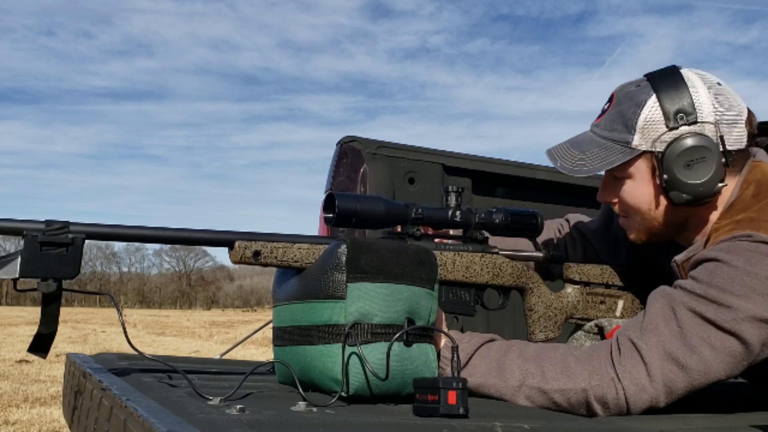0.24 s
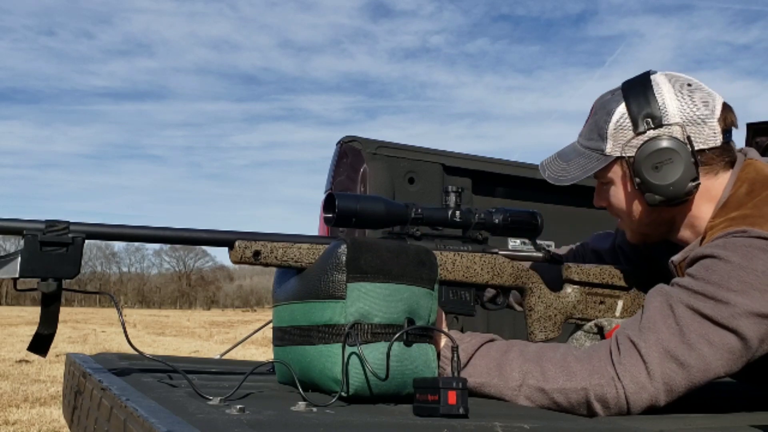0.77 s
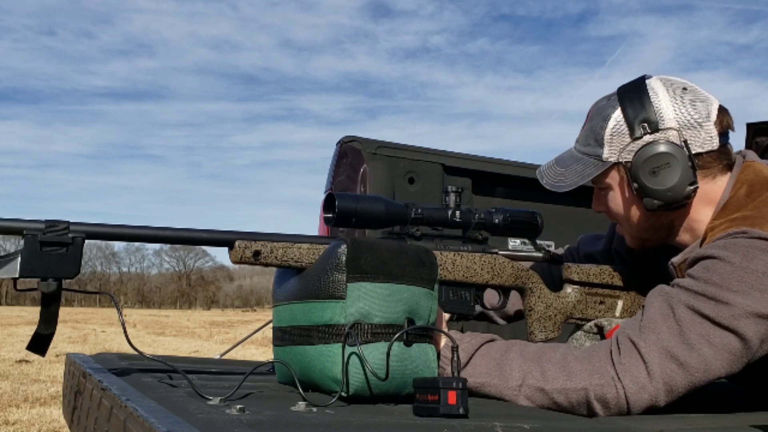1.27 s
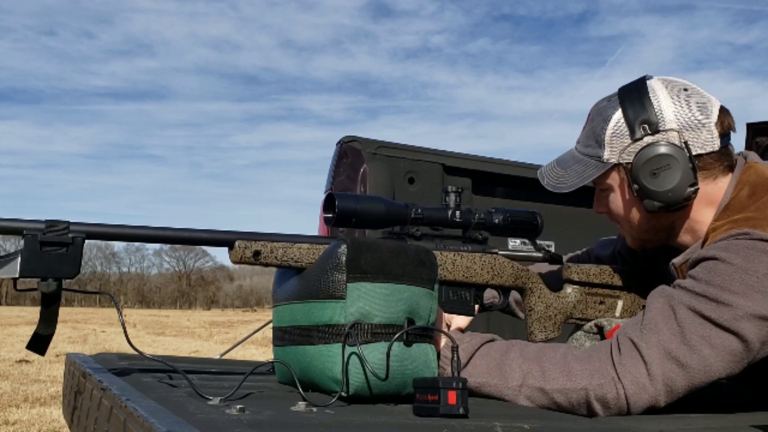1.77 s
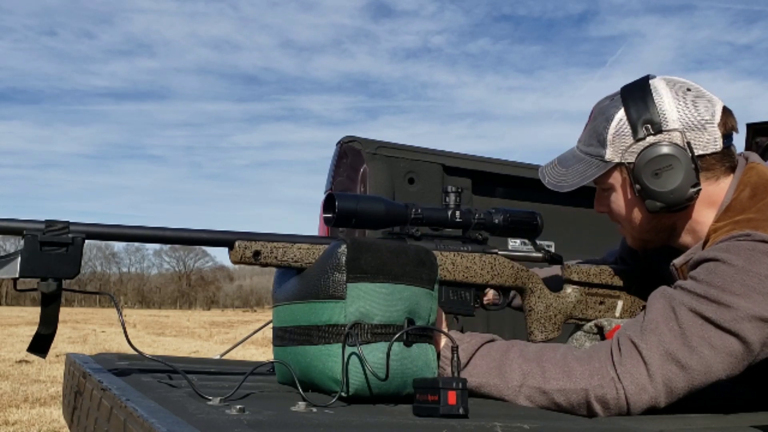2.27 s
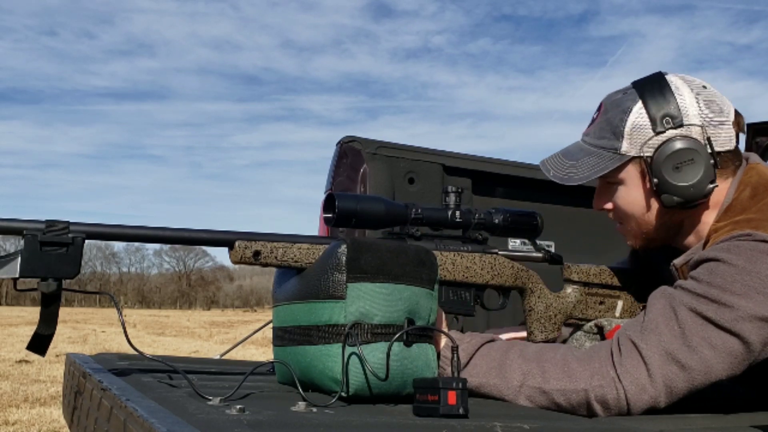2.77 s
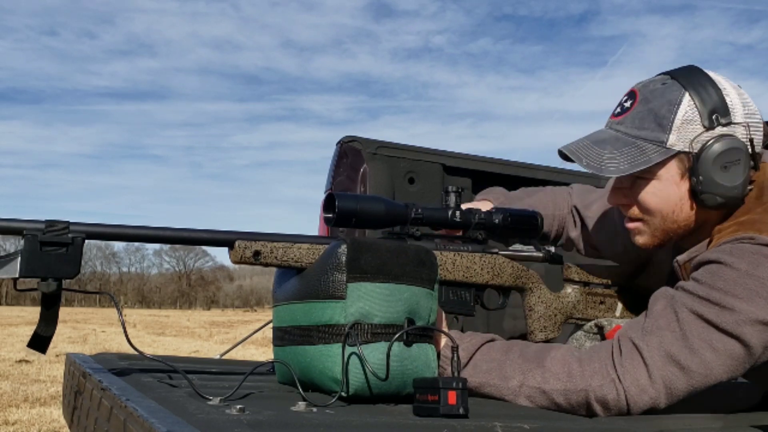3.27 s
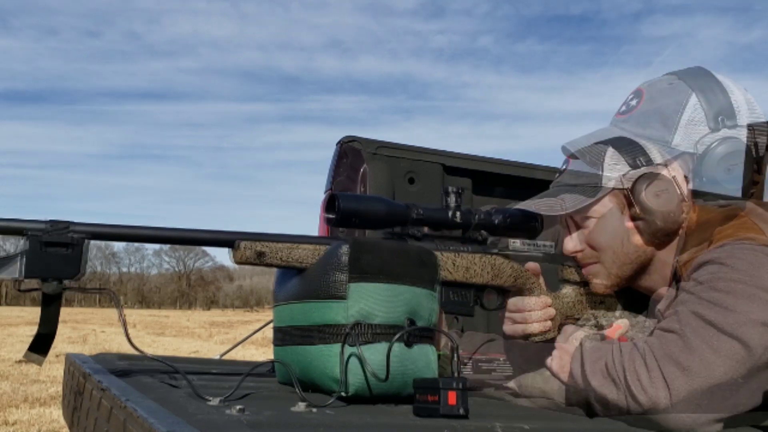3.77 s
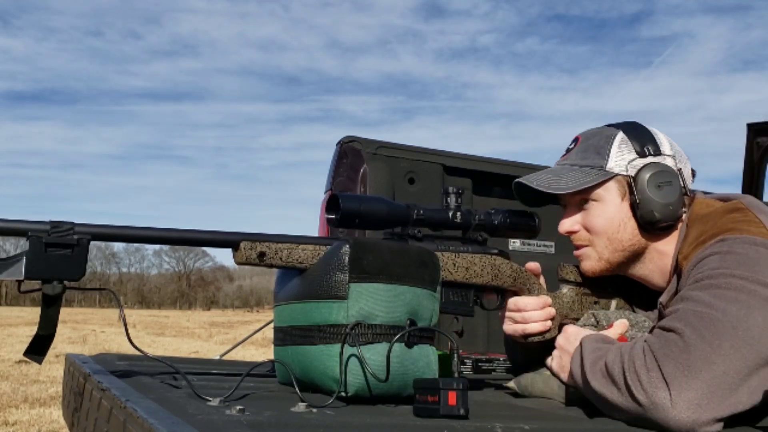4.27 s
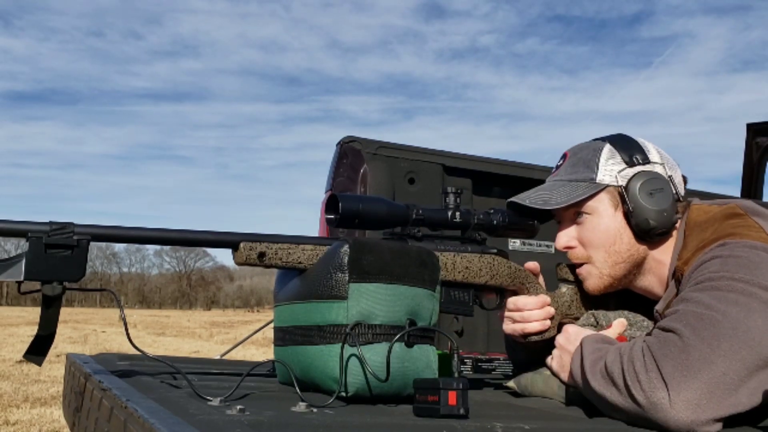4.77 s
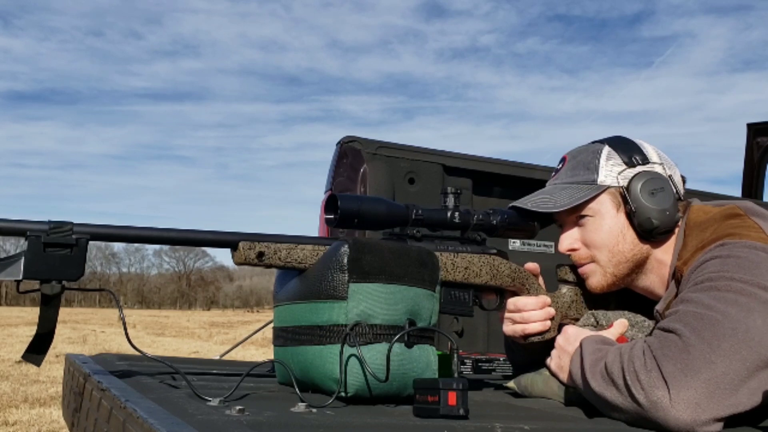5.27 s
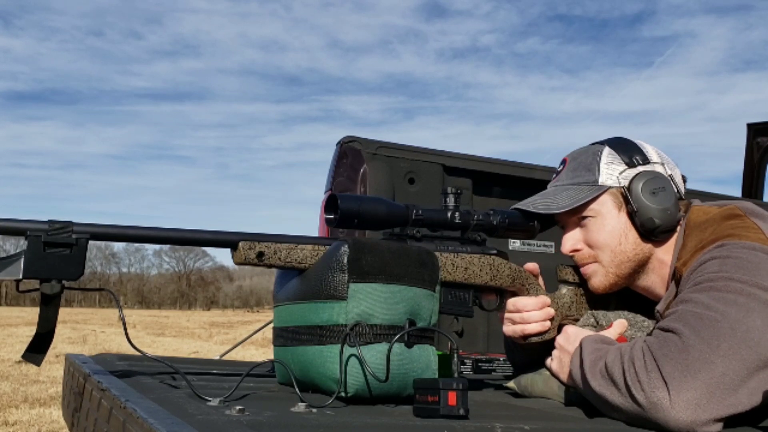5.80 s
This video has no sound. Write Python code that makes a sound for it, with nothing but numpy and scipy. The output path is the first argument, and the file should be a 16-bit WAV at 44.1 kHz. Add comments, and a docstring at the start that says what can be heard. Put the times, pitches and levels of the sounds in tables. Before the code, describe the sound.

A bolt-action rifle is worked on a rest in an open pickup bed in a quiet field. The bolt slides briefly with soft bumps, then clacks shut with a hard double steel knock. A hollow clunk follows, then tiny metallic chinks and a dull shift. Heavy thumps boom in the bed, trailed by faint taps and rubbing. Close stereo microphones catch low wind buffeting and faint hiss.

```python
"""In the open bed of a pickup, in a quiet field, a bolt-action rifle is worked on a rest. The bolt slides and
clacks shut, the action clunks hollowly, and the shooter's weight thumps the bed. Soft bumps, dry ticks, chinks
and rubbing fill the gaps, over gusts of rumble and a faint hiss that sinks midway and returns at once with a
tick and a low bump, then a low drone. Blows are coloured clicks with dense reflections, some with decaying
modes; friction, breeze and background are filtered noise under moving gains."""
import sys
import numpy as np
from scipy import signal
from scipy.fft import rfft, irfft, next_fast_len
from scipy.io import wavfile

SR = 44100
rng = np.random.default_rng(int(sys.argv[2]) if len(sys.argv) > 2 else 0)


def master_out(mix):
    """Clip the mix to full scale and print it as 16-bit PCM to the path in sys.argv[1]."""
    frames = np.transpose(np.atleast_2d(mix))
    ceiling = np.clip(frames, -1, 1)
    pcm = np.round(ceiling * 32767).astype(np.int16)
    wavfile.write(sys.argv[1], SR, pcm)


N = 266408
TIME = np.arange(N) / SR
RETURN_S = 3.743   # the sunken background comes back, with a tick and a low bump

# colour of small hard contacts: pitch_hz, level_db (per Hz)
TICK_COLOUR = [(600, -22), (1400, 8.5), (3000, -3), (5200, -0.5), (6400, -11.5), (7000, -3.5), (7400, -0.5),
               (7900, -6.5), (8600, -18), (15000, -12)]


def from_db(db):
    """Decibels to gain."""
    return 10 ** (np.asarray(db) / 20)


def rms_one(x):
    """Scale to rms 1."""
    return x / np.sqrt(np.mean(x ** 2) + 1e-20)


def at_hz(points, hz):
    """Read a table on a log-frequency axis."""
    table_hz, value = np.transpose(points)
    return np.interp(np.log(np.maximum(hz, 1)), np.log(table_hz), value)


def coloured(x, colour, tilt_db=0):
    """Causal (minimum-phase) filter with the given spectrum, tilted per octave and falling away past its ends."""
    n = x.shape[-1]
    size = 2 * next_fast_len(n // 2 + 4096)
    hz = np.maximum(np.fft.rfftfreq(size, 1 / SR), 1)
    loudest_hz = max(colour, key=lambda point: point[1])[0]
    octaves_outside = np.abs(np.log2(hz / np.clip(hz, colour[0][0], colour[-1][0])))
    db = at_hz(colour, hz) + tilt_db * np.log2(hz / loudest_hz) - 18 * octaves_outside
    # folding the cepstrum forward in time gives the minimum phase
    cepstrum = irfft(np.log(from_db(db) + 1e-7))
    cepstrum[1:size // 2] *= 2
    cepstrum[size // 2 + 1:] = 0
    response = np.exp(rfft(cepstrum))
    return irfft(rfft(x, size) * response)[..., :n]


def diffuse(n):
    """Noise from all sides at two spaced microphones: alike in the bass, unrelated in the treble."""
    spacing_m, sound_m_per_s = 0.26, 343
    alike = .97 * np.sinc(2 * np.fft.rfftfreq(n, 1 / SR) * spacing_m / sound_m_per_s)
    mid, side = rfft(rng.standard_normal((2, n)))
    return irfft(np.sqrt(1 + alike) * mid + np.sqrt(1 - alike) * side * [[1], [-1]], n)


def scatter(t, early_t60, ring_db):
    """Dense reflections in third-octave bands: a quick burst, then the bed's slower ring, each band at its own pace."""
    # ring of the truck bed: pitch_hz, t60_s
    bed_decay = [(80, 0.14), (250, 0.53), (600, 0.46), (1200, 0.29), (3000, 0.17), (10000, 0.26)]
    noise, hz = rfft(diffuse(len(t))), np.fft.rfftfreq(len(t), 1 / SR)
    edges = np.r_[0, np.geomspace(100, SR / 2, 24)]
    out = 0
    for low, high in zip(edges, edges[1:]):
        band = irfft(noise * ((hz >= low) & (hz < high)), len(t))
        ring_t60 = at_hz(bed_decay, (low + high) / 2)
        burst_t60 = early_t60 * ring_t60 / at_hz(bed_decay, 1000)   # early_t60 holds at 1 kHz
        fade = from_db(-60 * t / burst_t60) + from_db(ring_db - 60 * t / ring_t60)
        out = out + rms_one(band * fade) * np.sqrt(high - low)
    return rms_one(out) / np.sqrt(len(t))   # the energy of a one-sample click


def ringing(t, modes, tilt_db):
    """Decaying modes; sharp contacts favour high ones, which reach the two sides up to a quarter cycle apart."""
    out = 0
    for k, (hz, db, t60) in enumerate(modes):
        sign = (-1) ** k
        skew = sign * np.pi / 4 * np.tanh((hz / 700) ** 1.2) * np.array([[1], [-1]])
        strength_db = db + tilt_db * np.log2(hz / modes[0][0]) + rng.normal(0, 1)
        fade = from_db(strength_db - 60 * t / t60)
        out = out + sign * fade * np.sin(2 * np.pi * hz * t + skew)
    return out


def blows(hits, colour, level_db, direct_db, early_t60, ring_db, rise_s, modes=(), modes_db=0, echo_db=-40):
    """A coloured click and its echo off the bed wall; dense reflections and the part's modes build up over rise_s."""
    wall_echo_s = .0105
    t = np.arange(2 ** 15) / SR
    build = 1 - np.exp(-t / rise_s)
    echo = signal.unit_impulse(len(t), int(wall_echo_s * SR))
    strike = signal.unit_impulse(len(t)) + from_db(echo_db) * echo
    out = np.zeros((2, N + len(t)))
    for start_s, db, tilt_db in hits:
        click = build * scatter(t, early_t60, ring_db) + from_db(direct_db) * strike
        blow = rms_one(coloured(click, colour, tilt_db))
        if len(modes):
            blow = blow + from_db(modes_db) * rms_one(build ** 2 * ringing(t, modes, tilt_db))
        start = int(start_s * SR)
        out[:, start:start + len(t)] += from_db(db + level_db) * rms_one(blow)
    return out[:, :N]


def strokes(moves):
    """Gain of separate strokes: each swells to a rounded peak, then dies away evenly in decibels."""
    range_db = 19   # gained over the rise and lost over the fall
    power = 0
    for peak_s, db, rise_s, fall_s in moves:
        away = np.where(TIME < peak_s, ((peak_s - TIME) / rise_s) ** 2, (TIME - peak_s) / fall_s)
        power = power + from_db(db - range_db * np.minimum(away, 10)) ** 2
    return np.sqrt(power)


def rubbing(moves, colour, catches_per_s, catch_db):
    """Friction: a smooth hiss with tiny random catches in it."""
    snags = (rng.random(N) < catches_per_s / SR) * rng.standard_normal((2, N))
    friction = diffuse(N) + from_db(catch_db) * rms_one(snags)
    return strokes(moves) * rms_one(coloured(friction, colour))


def steady(before_db, after_db):
    """Gain of a steady layer: it sinks ever faster for a second, returns at once at a new level, then eases off."""
    sink_start_s, sink_db, sink_power = 2.75, 15.5, 1.35
    ease_db_per_s = 1.78
    sunk = np.clip((TIME - sink_start_s) / (RETURN_S - sink_start_s), 0, 1) ** sink_power
    easing_db = after_db - ease_db_per_s * (TIME - RETURN_S)
    return from_db(np.where(TIME < RETURN_S, before_db - sink_db * sunk, easing_db))


def background():
    """Open air from all sides, and the microphones' own unrelated hiss."""
    # open air: pitch_hz, level_db (per Hz)
    air_colour = [(260, -35), (450, -2), (560, -6.5), (772, -2), (1220, -9), (2110, -11.5), (4000, -30.5),
                  (5200, -43), (8800, -120)]
    # microphone hiss: pitch_hz, level_db (per Hz)
    hiss_colour = [(1470, -30), (2500, -3.5), (8380, -14), (12100, -7), (14800, -7), (15400, -5.5)]
    air = steady(before_db=-79.5, after_db=-74.5) * rms_one(coloured(diffuse(N), air_colour))
    hiss = rms_one(coloured(rng.standard_normal((2, N)), hiss_colour)) * from_db([[.5], [-.5]])
    return air + steady(before_db=-80.0, after_db=-77) * hiss


def gusts():
    """Strength of the breeze: each gust rises, holds and lets go, in random lumps."""
    # gusts before their lumps: start_s, end_s, level_db
    spells = [(0.015, 0.416, -49.5), (0.464, 0.63, -55.5), (0.824, 1.197, -51), (1.38, 1.943, -47.5),
              (2.2, 2.722, -67.5), (3.216, 3.702, -57.5), (4.016, 4.349, -62)]
    attack_s, release_s = 0.13, 0.17   # time to gain or lose 20 dB
    lumps_per_s, lump_db = 24, 2.5
    power = 0
    for start_s, end_s, db in spells:
        away = np.maximum((start_s - TIME) / attack_s, (TIME - end_s) / release_s)
        power = power + from_db(db - 20 * np.clip(away, 0, 10)) ** 2
    knots = np.arange(512)
    lumps = np.interp(TIME * lumps_per_s, knots, rng.standard_normal(len(knots)))
    return np.sqrt(power) * from_db(lump_db * lumps)


def wind(gust):
    """The breeze buffets each microphone on its own: unrelated low noise left and right."""
    # buffeting: pitch_hz, level_db (per Hz)
    colour = [(20, -9), (40, -3), (70, -2), (120, -7), (250, -27)]
    buffeting = rms_one(coloured(rng.standard_normal((2, N)), colour))
    return gust * buffeting * from_db([[-2.5], [1.5]])


def rumble(gust):
    """Deep and hollow rumble: a steady part, and a part raised by the gusts."""
    # deep rumble: pitch_hz, level_db (per Hz)
    deep_colour = [(20, -22), (45, -8.5), (65, 3), (85, -2.5), (115, -6), (160, -19.5)]
    # hollow rumble: pitch_hz, level_db (per Hz)
    hollow_colour = [(110, -2.5), (160, -5.5), (240, 2), (320, 2.5), (400, -4.5), (500, -6.5), (650, -25)]
    gust_deep_db, gust_hollow_db = -13, -15   # against the gusts' strength
    deep_gain = np.hypot(steady(before_db=-70, after_db=-73.5), gust * from_db(gust_deep_db))
    hollow_gain = np.hypot(steady(before_db=-79, after_db=-71.5), gust * from_db(gust_hollow_db))
    deep = deep_gain * rms_one(coloured(diffuse(N), deep_colour))
    return deep + hollow_gain * rms_one(coloured(diffuse(N), hollow_colour))


def bolt_slide():
    """The bolt slides in its raceway: dense catches over a hiss."""
    # slide: peak_s, level_db, rise_s, fall_s
    moves = [(0.066, -42, 0.056, 0.043)]
    # sliding steel: pitch_hz, level_db (per Hz)
    colour = [(350, -17), (550, -8.5), (800, -6), (1150, 4), (1450, -11), (1850, -10.5), (2100, -37),
              (2500, -14), (3100, -37), (3800, -20.5), (5300, -51), (6800, -36), (9000, -49),
              (11200, -32.5), (14000, -51)]
    return rubbing(moves, colour, catches_per_s=1000, catch_db=3.5)


def ticks():
    """Small dry ticks: mostly direct click, with a very short burst of reflections."""
    # ticks, strength before the layer's level: start_s, strength_db, brightness_db_per_octave; the last comes
    # as the background returns
    hits = [(0.0752, -34.5, -10.5), (0.0856, -49, 4), (2.698, -57, 4), (3.743, -50, -1.5)]
    return blows(hits, TICK_COLOUR, level_db=-35.5, direct_db=2, early_t60=0.029, ring_db=-14.5,
                 rise_s=0.00027)


def bumps():
    """Soft bumps build slowly and only stir the bed's bass."""
    # bumps, strength before the layer's level: start_s, strength_db, brightness_db_per_octave; the one at 3.744
    # s comes as the background returns
    hits = [(0.094, -36, -0.5), (0.121, -34.5, 0), (0.227, -29.5, -5), (0.313, -43, 4), (0.351, -45.5, 2.5),
            (0.623, -51, 3.5), (0.835, -43.5, -5), (0.950, -33.5, -2.5), (1.344, -45, 2),
            (1.395, -40, -1.5), (1.709, -35, -4), (1.844, -30.5, -1), (1.923, -38, 2), (2.292, -44.5, -5),
            (3.296, -38.5, -3.5), (3.546, -45, 1), (3.744, -34.5, -2.5), (4.812, -40, -1)]
    # soft contact: pitch_hz, level_db (per Hz)
    colour = [(25, -20.5), (50, 12), (85, 10), (150, 2.5), (280, -9.5), (420, -14.5), (650, -58.5),
              (1500, -51), (5000, -77.5)]
    soft = blows(hits, colour, level_db=-21.5, direct_db=-8.5, early_t60=0.02, ring_db=-25.5, rise_s=0.0028)
    return soft * from_db([[-.5], [.5]])


def bolt_catch():
    """Light clicks of the bolt's catch, with a strong echo off the bed wall."""
    # clicks, strength before the layer's level: start_s, strength_db, brightness_db_per_octave
    hits = [(1.395, -47.5, 1.5), (1.434, -50.5, -6.5)]
    # catch: pitch_hz, level_db (per Hz)
    colour = [(650, -18), (1000, 9.5), (1250, -12), (1600, -2.5), (2000, -13), (2450, -3.5), (3000, -1),
              (3700, -12.5), (6500, -22), (9000, -35.5), (15000, -36)]
    return blows(hits, colour, level_db=-25, direct_db=-9.5, early_t60=0.042, ring_db=0.5,
                 rise_s=0.00045, echo_db=-2)


def bolt_clacks():
    """The bolt clacks shut: steel on steel, with the bolt's modes ringing."""
    # clacks, strength before the layer's level: start_s, strength_db, brightness_db_per_octave
    hits = [(1.478, -48, -0.5), (1.4802, -20, 0), (1.5425, -24.5, 0.5), (1.5725, -38, -5)]
    # bolt contact: pitch_hz, level_db (per Hz)
    colour = [(120, -53), (200, -42.5), (344, -5), (383, -6.5), (467, 0.5), (659, -4), (833, -7.5),
              (1090, -3.5), (1260, -16), (1630, -16), (2600, -18.5), (2900, -14.5), (4890, -40.5),
              (9210, -53.5), (15000, -60.5)]
    # bolt modes: pitch_hz, relative level_db, t60_s
    modes = [(482, -5, 0.16), (505, 0, 0.2), (605, 0.5, 0.17), (1043, -3, 0.11), (1112, -15.5, 0.29),
             (1270, -20.5, 0.074), (1650, -11.5, 0.11), (1600, -2, 0.098), (2194, -11, 0.077),
             (2490, -19.5, 0.118), (2918, -10, 0.13), (3010, -4, 0.0438), (3760, -11, 0.045)]
    return blows(hits, colour, level_db=-23.5, direct_db=-6.0, early_t60=0.21, ring_db=-22,
                 rise_s=0.00045, modes=modes, modes_db=-3.5, echo_db=-7.5)


def drag():
    """A part is dragged softly along the stock and ends in a short bright scratch."""
    # drag: peak_s, level_db, rise_s, fall_s
    drag_moves = [(2.105, -69, 0.081, 0.17)]
    # soft drag: pitch_hz, level_db (per Hz)
    drag_colour = [(600, -3), (850, 9), (1200, 2), (1700, -11.5), (3000, -17.5), (4600, -21.5), (7000, -28)]
    # scratch: peak_s, level_db, rise_s, fall_s
    scratch_moves = [(2.214, -66.5, 0.029, 0.043)]
    # bright scratch: pitch_hz, level_db (per Hz)
    scratch_colour = [(900, -10), (1230, 9), (1600, -10), (3000, -11), (4200, 3), (5000, -2), (6200, -8),
                      (9000, -19), (14000, -22)]
    soft = rubbing(drag_moves, drag_colour, catches_per_s=66, catch_db=1)
    return soft + rubbing(scratch_moves, scratch_colour, catches_per_s=400, catch_db=1)


def action_clunk():
    """The action clunks: a light touch and then the seat, ringing its low hollow modes."""
    # touch and seat, strength before the layer's level: start_s, strength_db, brightness_db_per_octave
    hits = [(2.6535, -26.5, -0.5), (2.6555, -16.5, 0.5)]
    # action contact: pitch_hz, level_db (per Hz)
    colour = [(100, -31.5), (170, -12), (250, -2.5), (390, -8.5), (530, 5), (650, -1), (800, 1),
              (1150, -10.5), (1400, -13), (2000, -25), (2400, -27.5), (3200, -30.5), (5500, -54),
              (12000, -68.5)]
    # action modes: pitch_hz, relative level_db, t60_s
    modes = [(211, -18.5, 0.26), (256, -3, 0.17), (343, -9.5, 0.5), (438.5, -19, 0.58), (498, -3.5, 0.24),
             (576, -10.5, 0.21), (712, -17, .33), (692, -9, 0.22), (755, -4.5, .2), (809, -8.5, 0.12),
             (847, 0.5, 0.2), (1052, -9.5, 0.14), (1121, -6, .2), (1260, -2, 0.1), (1373, -28, .14),
             (1450, -29.5, 0.14), (1720, -14, 0.17), (1930, -16.5, 0.09), (2960, -31, .1)]
    return blows(hits, colour, level_db=-19.5, direct_db=-15.5, early_t60=0.14, ring_db=-3,
                 rise_s=0.00061, modes=modes, modes_db=-4.5)


def chinks():
    """A small steel part chinks: a tick with high ringing modes."""
    # chinks, strength before the layer's level: start_s, strength_db, brightness_db_per_octave
    hits = [(3.5857, -52, 3), (3.5965, -52.5, 3), (3.616, -59, 2)]
    # small steel part: pitch_hz, relative level_db, t60_s
    modes = [(1570, -4, 0.18), (3240, 0, 0.11), (3876, 3, 0.1), (5150, 4, 0.15), (7340, -6, 0.14),
             (7480, -9, 0.14), (9700, -5, .05)]
    return blows(hits, TICK_COLOUR, level_db=-35.5, direct_db=-5.5, early_t60=0.025, ring_db=-4,
                 rise_s=0.0003, modes=modes, modes_db=-2.5)


def stock_shift():
    """The stock shifts on its sandbag: dull friction with sparse, weak catches."""
    # shift: peak_s, level_db, rise_s, fall_s
    moves = [(3.655, -50.5, 0.062, 0.067)]
    # sandbag: pitch_hz, level_db (per Hz)
    colour = [(120, -1), (220, -2), (370, -1.5), (480, -7.5), (700, -23.5), (1200, -42)]
    return rubbing(moves, colour, catches_per_s=110, catch_db=-13.0)


def drone():
    """A low outdoor drone comes in when the background returns, then eases off with it."""
    # drone: pitch_hz, level_db (per Hz)
    colour = [(15, -51), (25, -25), (58, 3), (86, 0.5), (155, -2.5), (260, -12.5), (334, -22.5), (362, -21),
              (387, -22), (600, -28), (780, -54.5), (1320, -120)]
    gain = (TIME >= RETURN_S) * steady(before_db=-56, after_db=-56)
    return gain * rms_one(coloured(diffuse(N), colour))


def bed_thumps():
    """Heavy thumps boom in the bed's panels, with a woody knock on top."""
    # thumps, strength before the layer's level: start_s, strength_db, brightness_db_per_octave
    hits = [(3.997, -25, -4), (4.0935, -12.5, 1.5), (5.118, -36, -3)]
    # boom: pitch_hz, level_db (per Hz)
    boom_colour = [(50, -22.5), (95, -2.5), (180, 8), (270, 10.5), (400, -7), (600, -28), (700, -14),
                   (900, -17.5), (1150, -44.5), (1400, -54), (2300, -71), (2900, -81), (5000, -71)]
    # bed panel modes: pitch_hz, relative level_db, t60_s
    modes = [(73.3, -19.5, 0.77), (110, 1, 0.095), (125, 0.5, 0.059), (159.5, -9, 0.28), (199, 2, 0.025),
             (245, 2.5, 0.073), (275.6, -13, 0.38), (676, -23.5, 0.21), (812, -29.5, 0.25),
             (867, -22.5, 0.17), (1065, -26, 0.11), (1202, -37.5, 0.17), (2200, -57, 0.061)]
    # woody knock: pitch_hz, level_db (per Hz)
    knock_colour = [(300, -10), (450, 9.5), (600, 8), (730, -3.5), (900, 6), (1150, -9), (1400, -16),
                    (1700, -17), (2300, -20), (2900, -39), (5000, -39)]
    boom = blows(hits, boom_colour, level_db=-22.5, direct_db=-2, early_t60=.045, ring_db=-10,
                 rise_s=.0012, modes=modes, modes_db=0)
    knock = blows(hits, knock_colour, level_db=-43.5, direct_db=-16, early_t60=0.08, ring_db=6.5,
                  rise_s=0.00063)
    return (boom + knock) * from_db([[.7], [-.7]])


def bed_drumming():
    """The bed's floor drums on after weight lands on it: swells of low noise."""
    # drumming: peak_s, level_db, rise_s, fall_s
    moves = [(4.175, -40, 0.17, 0.22), (5.26, -49.5, 0.076, 0.67)]
    # floor: pitch_hz, level_db (per Hz)
    colour = [(45, -20), (72, 4.5), (100, -5), (135, -8.5), (250, -29)]
    return strokes(moves) * rms_one(coloured(diffuse(N), colour))


def sleeve():
    """A sleeve brushes the rest: a broad rustle of many fine catches."""
    # brush: peak_s, level_db, rise_s, fall_s
    moves = [(4.41, -64.5, 0.12, 0.12)]
    # cloth: pitch_hz, level_db (per Hz)
    colour = [(300, -5.5), (900, 7.5), (1600, 3.5), (2700, 5.5), (4500, 0.5), (6500, 3.5), (7700, 0),
              (9000, -12.5), (15000, -9)]
    return rubbing(moves, colour, catches_per_s=1800, catch_db=-2.5)


def stock_taps():
    """Hands tap the stock: soft contacts that build over some milliseconds."""
    # taps, strength before the layer's level: start_s, strength_db, brightness_db_per_octave
    hits = [(4.455, -48.5, 2.5), (4.770, -46.5, 0.5), (5.195, -39, 0)]
    # hand on stock: pitch_hz, level_db (per Hz)
    colour = [(60, 14), (130, 5), (250, 5.5), (400, -13), (550, -7), (700, -10.5), (1000, -12),
              (1400, -26.5), (2300, -37), (3500, -38), (6000, -53)]
    return blows(hits, colour, level_db=-20, direct_db=-15, early_t60=0.037, ring_db=-12.0, rise_s=0.0052)


def fingers():
    """Fingers rub the stock: smooth friction with sparse catches."""
    # rubs: peak_s, level_db, rise_s, fall_s
    moves = [(4.78, -73, 0.45, 0.55), (5.43, -66.5, 0.11, 0.21)]
    # skin on stock: pitch_hz, level_db (per Hz)
    colour = [(400, 9.5), (800, 4), (1300, -6), (1800, -13.5), (2600, -8), (3500, -17), (7000, -23.5)]
    return rubbing(moves, colour, catches_per_s=170, catch_db=-9)


def scene():
    """Clicks, thuds, friction and background together."""
    gust = gusts()
    outdoors = background() + wind(gust) + rumble(gust) + drone()
    clicks = ticks() + bolt_catch() + bolt_clacks() + action_clunk() + chinks() + stock_taps()
    thuds = bumps() + bed_thumps() + bed_drumming()
    friction = bolt_slide() + drag() + stock_shift() + sleeve() + fingers()
    return outdoors + clicks + thuds + friction


def record(dry):
    """A steep elliptic low-pass cuts the top."""
    cutoff_hz, ripple_db, stop_db = 15600, .1, 70
    return signal.sosfilt(signal.ellip(10, ripple_db, stop_db, cutoff_hz, fs=SR, output="sos"), dry)


dry = scene()
out = record(dry)
master_out(out)
```